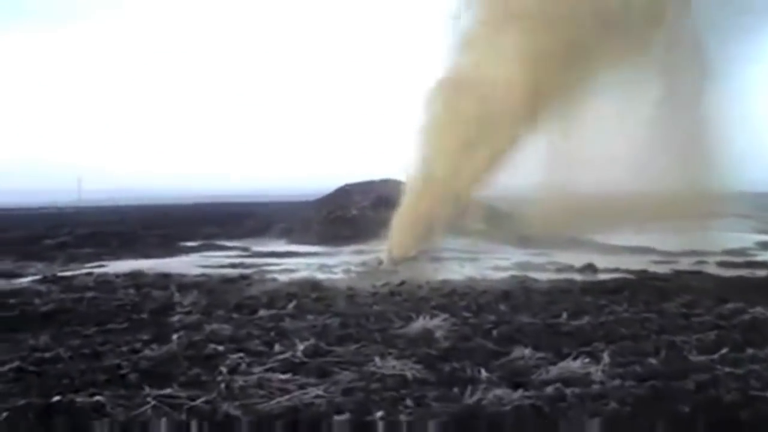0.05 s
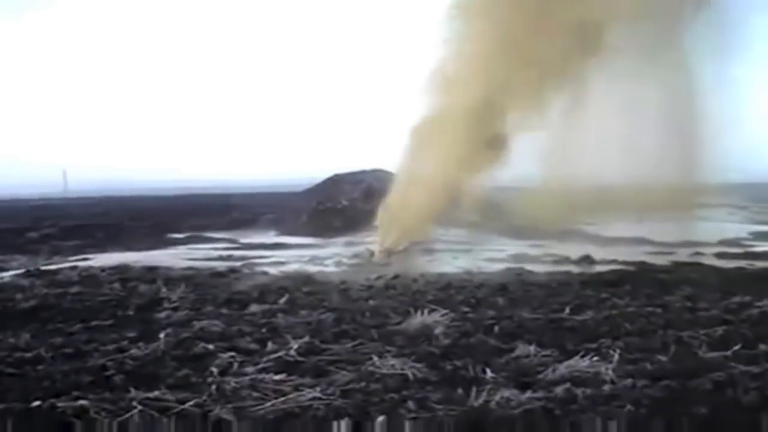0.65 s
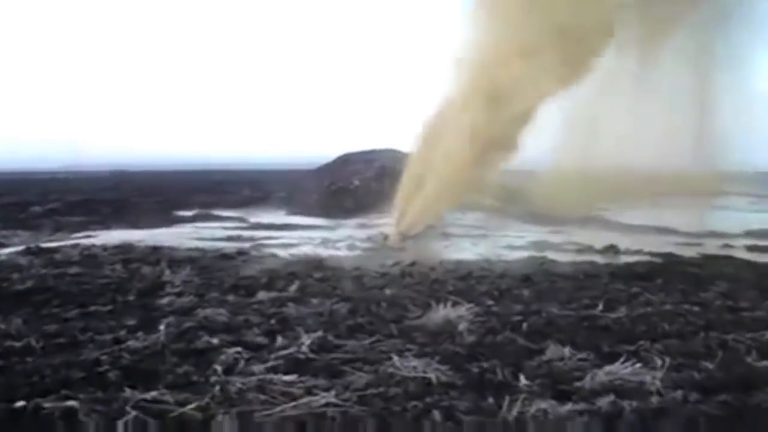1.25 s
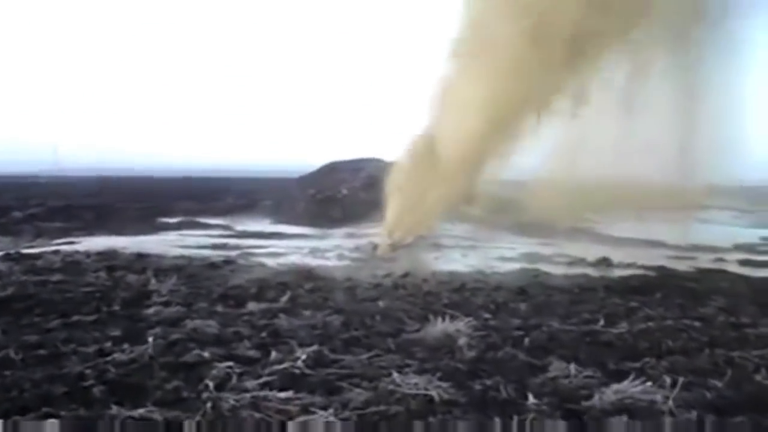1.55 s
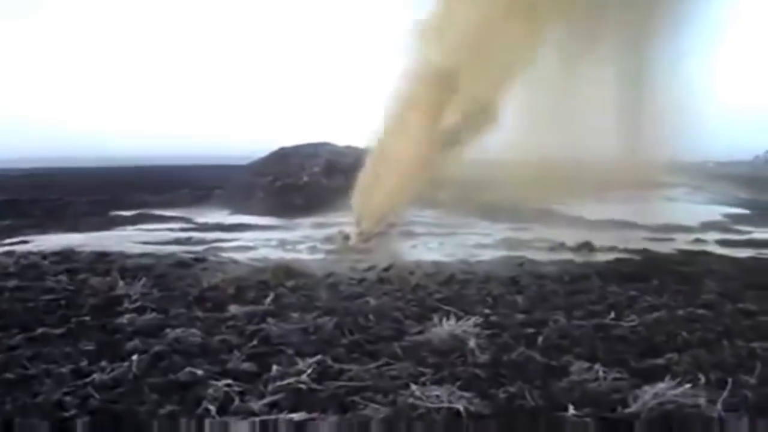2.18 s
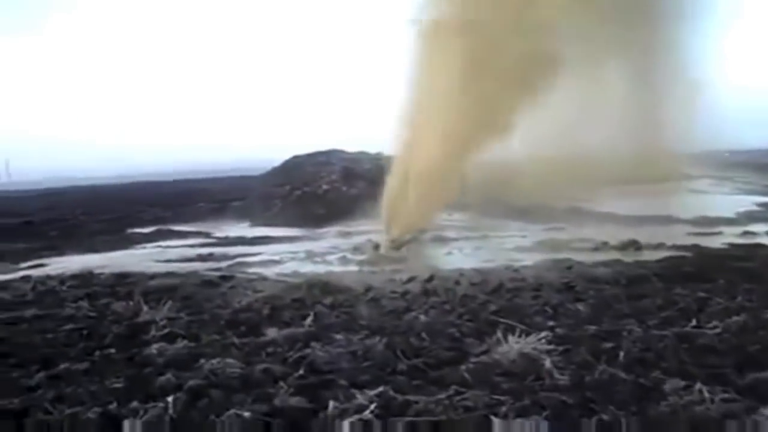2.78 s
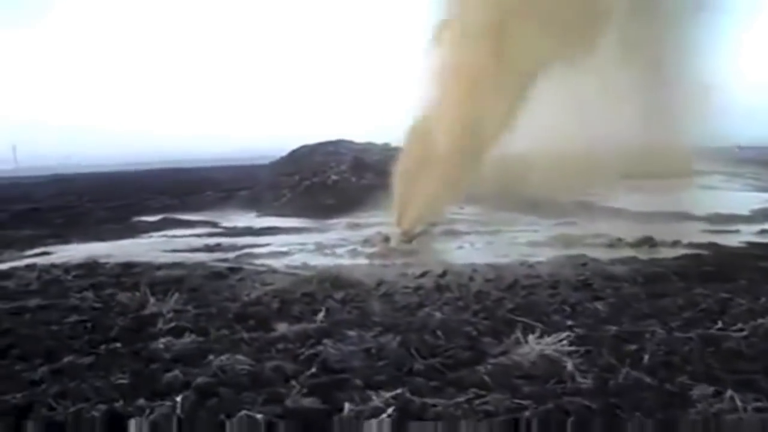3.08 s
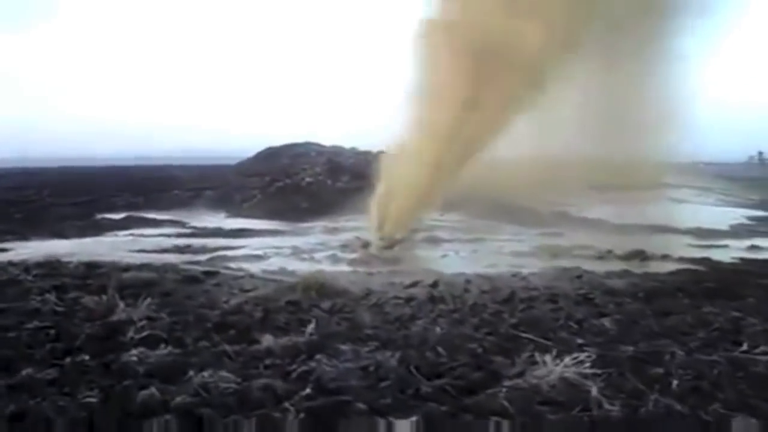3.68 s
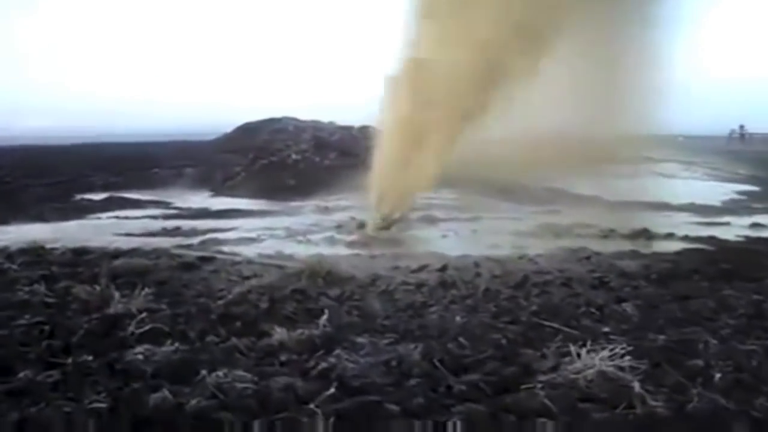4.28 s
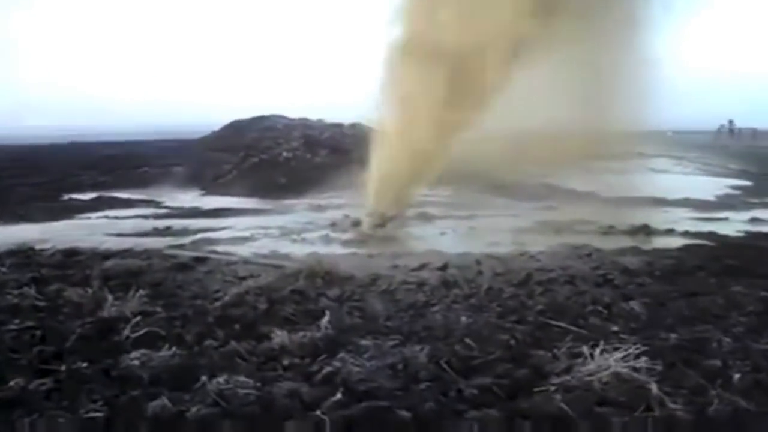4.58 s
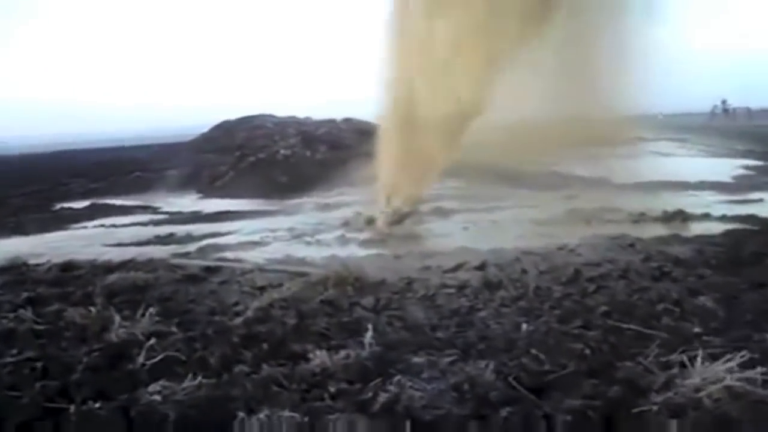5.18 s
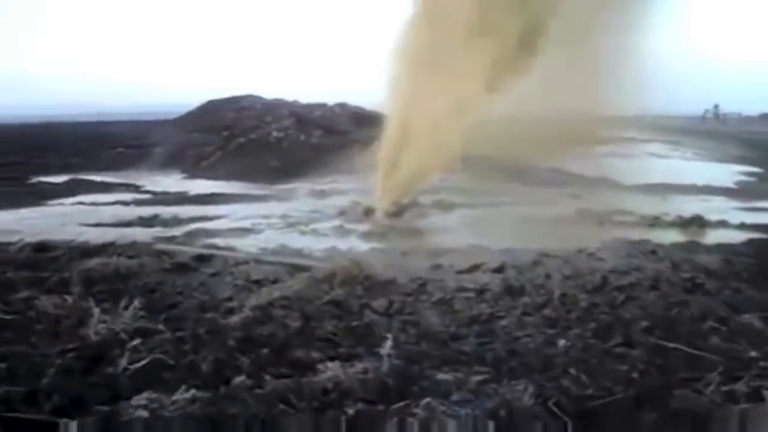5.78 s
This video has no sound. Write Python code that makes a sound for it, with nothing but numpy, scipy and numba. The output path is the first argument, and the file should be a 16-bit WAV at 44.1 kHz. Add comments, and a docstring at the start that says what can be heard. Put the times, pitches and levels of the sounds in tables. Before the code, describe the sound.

A jet of mud and gas blasts from a hole in open ground, loud and unbroken for about six seconds. It is a bright, hissing roar that throbs about eleven times a second. Each pulse carries fine crackling, bubbly gurgling and a hollow note from the hole, while drops of mud spatter on wet soil. The jet chokes briefly at about 0.4, 1.4, 2.3, 3.2, 4.2 and 5.1 seconds: it gets quieter and the throb slows into a deeper sputter before recovering. Heavier spurts stand out near 0.7, 2.2, 3.1, 3.5 and 4.4 seconds, each with a barely audible soft thump. A faint, high, breathy whistle sits in the hiss, sinking a little and fading after about four seconds. A very faint low rumble lies underneath. The spray gradually sharpens, and the jet is still going at the end.

```python
"""A throbbing roar: drilling mud and gas blast out of a hole in an open field.
Slugs of mud shoot through about eleven times a second; each swells the roar, deepens the hollow note of
the hole, and crackles and gurgles as it tears apart. About once a second the jet chokes and the throb
slows. Fine spray hisses on between the slugs, drops spatter down and the heaviest slugs thump softly.
Behind it all, gas whistles at the lip over the jet's faint low rumble, which eases at each choke."""
import sys
import numpy as np
from scipy import signal
from scipy.io import wavfile
from numba import njit

SR = 44100
rng = np.random.default_rng(int(sys.argv[2]) if len(sys.argv) > 2 else 0)


def store_wav(level_fs):
    """Save 16-bit WAV to argv[1]."""
    pcm = np.round(np.clip(np.atleast_2d(level_fs), -1, 1) * 32767)
    wavfile.write(sys.argv[1], SR, pcm.T.astype(np.int16))


N = 261949

# Tone of the jet's turbulence at the usual flow: f/Hz, relative level/dB
JET_SPECTRUM = [(40, -26), (170, -19), (240, -16.5), (340, -3), (500, -4.5), (700, 0.5), (1100, -2.5),
                (2000, -0.7), (3300, 0), (4300, 3.5), (5400, 1), (7200, -3.5), (8700, 0.5), (10000, -16)]
# The roar pumps hard with the slugs, the fine spray less: f/Hz, swing/(dB per dB of flow)
JET_SWING = [(120, 1.2), (300, 0.66), (650, 1.25), (1400, 1.73), (2000, 1.24), (3000, 1.0), (4200, 0.78),
             (6000, 0.53), (9000, 0.61)]
# Peaks and dips with which the outlet colours the blast: f/Hz, width/Hz, gain/dB
OUTLET_COLOUR = [(767, 57, -1.5), (1330, 360, -1.5), (1510, 120, 2.5), (1997, 44, -5), (2280, 73, -2),
                 (2710, 100, 1.9), (2935, 180, 2), (3240, 290, -0.5), (4040, 450, 1.1)]
# The jet chokes, so slugs come slower and weaker: t/s, half length/s, rate lost/(slugs per s), dip/dB
JET_CHOKES = [(0.41, 0.17, 4.03, 5), (1.378, 0.18, 3.62, 4), (2.299, 0.178, 3.786, 5),
              (3.249, 0.16, 4.34, 4), (4.180, 0.163, 4.088, 4.5), (5.123, 0.18, 3.67, 3)]
# Extra heavy slugs, mostly pent-up mud breaking free after a choke: t/s, extra flow/dB
HEAVY_SLUGS = [(0.706, 2.5), (0.967, 1.28), (1.044, 1.5), (1.655, 1.5), (2.207, 2.5), (2.550, 1.85),
               (3.074, 2.5), (3.513, 2.5), (4.383, 3), (5.256, 1.5), (5.782, 1.0)]
# Breathy gas whistle at the lip: t/s, f/Hz, base level/dB
LIP_WHISTLE = [(0, 3020, -36), (1.2, 3075, -34), (1.7, 3020, -40), (2.1, 2780, -41), (3.0, 2910, -39),
               (3.9, 2900, -39), (4.5, 2850, -47), (5.94, 2750, -44)]
# Bounce off the ground as the listener moves about: t/s, delay/ms, level/dB
GROUND_BOUNCE = [(0, 3.4, -9), (1.0, 3.06, -15), (2.6, 3.4, -20), (4.2, 3.34, -19), (4.6, 3.4, -12),
                 (5.1, 3.66, -20), (5.6, 3.12, -13), (5.94, 3.56, -19)]

SLUGS_PER_S, FIRST_SLUG_S = 11.604, -0.0033  # pulse of the open jet
FLOW_DB, FLOW_GROWS_DB_PER_S = 1.0, 0.04  # mean strength of the open jet
RING_GROWS_DB_PER_S, RING_UNEVEN_DB = 0.27, 1.1  # how hard a slug rings the hole
SIZZLE_DB, SIZZLE_GROWS_DB_PER_S, SIZZLE_UNEVEN_DB = -1.05, 0.4447, 0.66  # the spray slowly sharpens
NOTE_HZ, NOTE_SINKS_HZ_PER_S = 949, 10.6  # hollow note of the hole


def jet(flow_db, sizzle_db, level_db=-23.5, eddy_db=1.18, patchy_db=1.95, sizzle_hz=4500):
    """The roar: bands of turbulence swell with the flow; eddies shake them together and one by one."""
    edges = np.concatenate([[35, 70, 110, 160], 220 * 2 ** (np.arange(35) / 6)])
    white = rng.standard_normal((2, N))
    shaken_db = flow_db + eddy_db * flutter(rate_hz=70)
    roar, steady = 0, 0
    for k, (low, high) in enumerate(zip(edges, edges[1:])):
        hz = np.sqrt(low * high)
        noise = from_db(at_hz(JET_SPECTRUM, hz)) * band(white[k % 2], low, high, order=3)
        swing_db = at_hz(JET_SWING, hz) * shaken_db
        spray_db = sizzle_db * np.exp(-2 * np.log2(hz / sizzle_hz) ** 2)
        roar += noise * from_db(swing_db + spray_db + patchy_db * flutter(rate_hz=28))
        steady += noise
    return from_db(level_db) * roar / np.std(steady)


def surge():
    """The jet's rhythm: running slug count, driving pressure in dB, and how choked it is (0-1)."""
    per_s, choked = SLUGS_PER_S, 0
    pressure_db = FLOW_DB + FLOW_GROWS_DB_PER_S * seconds()
    for s, half_length_s, lost_per_s, dip_db in JET_CHOKES:
        choke = swell(s, half_length_s)
        per_s -= lost_per_s * choke
        pressure_db -= dip_db * choke
        choked += choke
    slugs = np.cumsum(per_s) / SR - FIRST_SLUG_S * SLUGS_PER_S
    return slugs, pressure_db, choked


def flow(slugs, pressure_db, choked, throb_db=2.5, sputter_db=1.0, uneven_db=0.31):
    """The throb, in dB: the jet swells and ebbs once a slug, and sputters more deeply when choked."""
    depth_db = throb_db + sputter_db * choked
    return pressure_db + depth_db * np.cos(2 * np.pi * slugs) + uneven_db * per_slug(slugs)


def hole(flow_db, ring_db, level_db=-29.5, sag_per_db=0.0024):
    """Lumps of mud knock the mouth of the hole into a hollow note, which sinks as more mud loads it."""
    note_hz = (NOTE_HZ - NOTE_SINKS_HZ_PER_S * seconds()) * (1 - sag_per_db * flow_db)
    knocks = rms_one(band(clicks(per_s=1500, spread_db=2.0), 600, 1270))
    knocks *= from_db(flow_db + ring_db)
    return from_db(level_db) * rms_one(gliding_resonance(knocks, note_hz, width_hz=125))


def crackle(flow_db, level_db=-29.0):
    """Gas pockets burst out of the mud as small shocks, hardest inside a slug."""
    shocks = clicks(per_s=1200, spread_db=4.0) * from_db(flow_db)
    return from_db(level_db) * rms_one(band(shocks, 746, 4620))


def gurgle(flow_db, level_db=-29.5, base_per_s=650, decay_cycles=13, chirp=0.013, swing=0.25):
    """Bubbles torn open in the froth ring briefly, rising a little in pitch; more flow tears more."""
    pops = clicks(base_per_s * from_db(flow_db) ** 2, spread_db=5.0) * from_db(swing * flow_db)
    froth = np.zeros(N)
    for i in np.flatnonzero(pops):
        hz = rng.uniform(1050, 5400)
        length = min(int(4 * decay_cycles * SR / hz), N - i)
        cycles = np.arange(length) * hz / SR
        age = cycles / decay_cycles
        froth[i:i + length] += pops[i] * np.exp(-age) * np.sin(2 * np.pi * cycles * (1 + chirp * age))
    return from_db(level_db) * rms_one(band(froth, 600, 9000))


def spatter(flow_db, level_db=-35.0, clump_db=3.5, swing=0.29):
    """Drops of mud rain back on the wet ground in clumps."""
    drops = clicks(per_s=1300, spread_db=4.5) * rng.choice([-1, 1], N)
    clumps = from_db(swing * flow_db + clump_db * flutter(rate_hz=25))
    return from_db(level_db) * rms_one(band(drops * clumps, 4000, 8000))


def whistle(flow_db, swing=0.59):
    """Gas shearing past the lip sings a rough, narrow note."""
    hz, level_db = in_time(LIP_WHISTLE)
    breath = band(rng.standard_normal(N), 2300, 3600)
    return from_db(level_db + swing * flow_db) * rms_one(gliding_resonance(breath, hz, width_hz=80))


def thump(heavy_db, base_db=-60.5):
    """A heavy slug shoves the air with a soft, low puff that grows with its extra flow."""
    return from_db(base_db) * heavy_db * rms_one(band(rng.standard_normal(N), 70, 400))


def over_ground(blast):
    """A weak inverted bounce off the wet soil combs the hiss; the comb drifts as the listener moves."""
    delay_ms, echo_db = in_time(GROUND_BOUNCE)
    n = np.arange(N)
    bounce = np.interp(n - delay_ms * SR / 1000, n, band(blast, 1200, 5000, order=1))
    return blast - from_db(echo_db) * bounce


def jet_rumble(pressure_db, level_db=-60.5, swing=0.9, lumpy_db=2.5):
    """The jet's faint, lumpy low rumble follows the pressure, easing at each choke."""
    rumble_db = level_db + swing * pressure_db + lumpy_db * flutter(rate_hz=6)
    return from_db(rumble_db) * rms_one(band(rng.standard_normal(N), 18, 135))


def from_db(db):
    """Decibels to gain."""
    return 10 ** (db / 20)


def rms_one(x):
    """Scale to rms 1."""
    return x / np.sqrt(np.mean(x ** 2) + 1e-20)


def seconds():
    """Time of every sample."""
    return np.arange(N) / SR


def swell(s, half_length_s):
    """Smooth hump of height 1 round time s."""
    return np.exp(-((seconds() - s) / half_length_s) ** 2)


def in_time(rows):
    """Turn timed breakpoints into one envelope per column."""
    s, *columns = np.transpose(rows)
    return [np.interp(seconds(), s, column) for column in columns]


def at_hz(rows, hz):
    """Read a spectrum on a log-frequency axis."""
    row_hz, values = np.transpose(rows)
    return np.interp(np.log(hz), np.log(row_hz), values)


def per_slug(slugs, count=100):
    """A random value of spread 1 for each slug, blending into the next."""
    return np.interp(slugs, np.arange(count), rng.standard_normal(count))


def flutter(rate_hz):
    """Smooth random wobble of rms 1, mostly slower than rate_hz."""
    r = np.exp(-2 * np.pi * rate_hz / SR)
    wobble = signal.lfilter([1], [1, -2 * r, r * r], rng.standard_normal(N + SR // 2))
    return rms_one(wobble[SR // 2:])


def clicks(per_s, spread_db):
    """Random clicks, many small and a few large."""
    sizes = from_db(spread_db * np.minimum(rng.exponential(1, N), 3))
    return sizes * (rng.random(N) < per_s / SR)


def band(x, low_hz, high_hz, order=2):
    """Butterworth band-pass."""
    sos = signal.butter(order, [low_hz, high_hz], "band", fs=SR, output="sos")
    return signal.sosfilt(sos, x + 1e-18)


def bell(x, hz, width_hz, gain_db):
    """Lift or cut a band round hz."""
    w, g = 2 * np.pi * hz / SR, from_db(gain_db / 2)
    a = np.sin(w) * width_hz / (2 * hz)
    middle = -2 * np.cos(w)
    return signal.lfilter([1 + a * g, middle, 1 - a * g], [1 + a / g, middle, 1 - a / g], x)


@njit
def gliding_resonance(x, hz, width_hz):
    """Two-pole resonance whose pitch follows hz."""
    poles = np.exp((2j * np.pi * hz - np.pi * width_hz) / SR)
    out, state = np.zeros(len(x)), 0j
    for i in range(len(x)):
        state = state * poles[i] + x[i]
        out[i] = state.real
    return out


def scene():
    """One flow drives the blast and the spatter, each slug with its own colour, over the jet's rumble."""
    slugs, pressure_db, choked = surge()
    heavy_db = sum(extra_db * swell(s, half_length_s=0.022) for s, extra_db in HEAVY_SLUGS)
    flow_db = flow(slugs, pressure_db, choked) + heavy_db
    ring_db = RING_GROWS_DB_PER_S * seconds() + RING_UNEVEN_DB * per_slug(slugs)
    sizzle_db = SIZZLE_DB + SIZZLE_GROWS_DB_PER_S * seconds() + SIZZLE_UNEVEN_DB * per_slug(slugs)
    blast = jet(flow_db, sizzle_db) + hole(flow_db, ring_db) + whistle(flow_db)
    blast += crackle(flow_db) + gurgle(flow_db)
    for hz, width_hz, gain_db in OUTLET_COLOUR:
        blast = bell(blast, hz, width_hz, gain_db)
    return (over_ground(blast) + spatter(flow_db) + thump(heavy_db) + jet_rumble(pressure_db))[None]


def record(dry, cutoff_hz=10050):
    """A steep low-pass takes the air off the top."""
    return signal.sosfilt(signal.ellip(12, .1, 90, cutoff_hz, fs=SR, output="sos"), dry)


dry = scene()
out = record(dry)
store_wav(out)
```